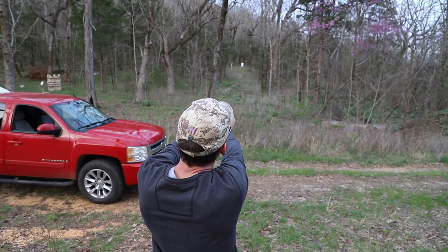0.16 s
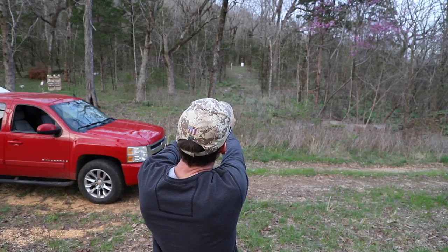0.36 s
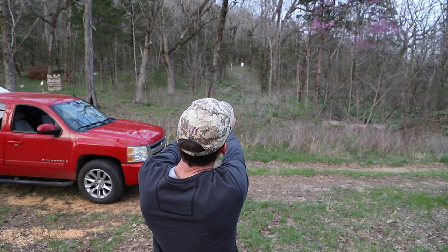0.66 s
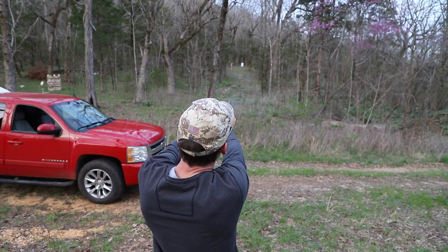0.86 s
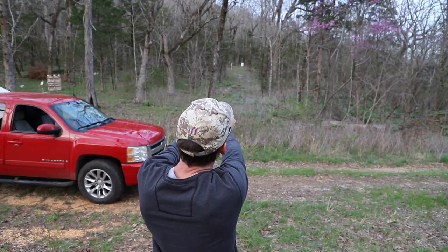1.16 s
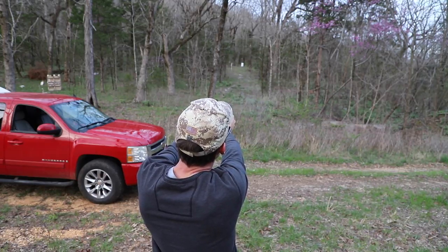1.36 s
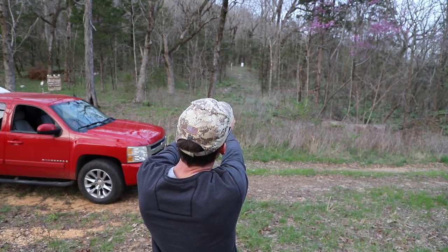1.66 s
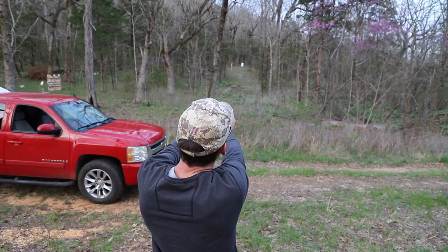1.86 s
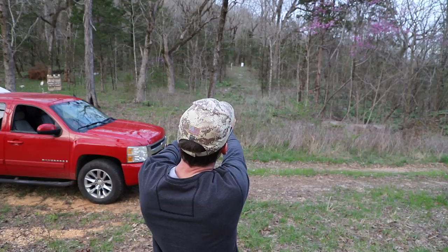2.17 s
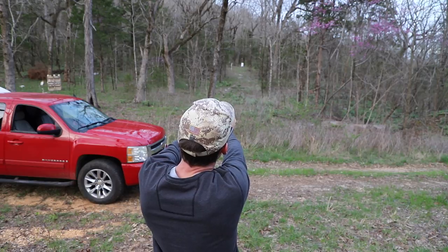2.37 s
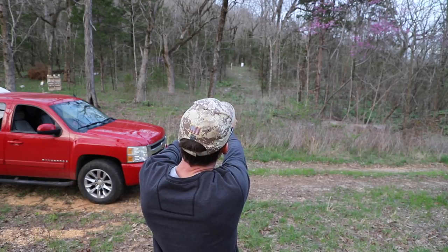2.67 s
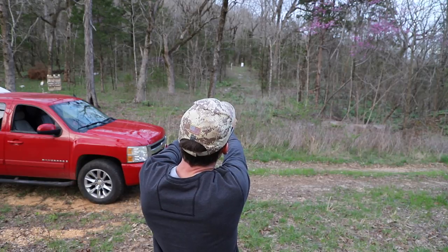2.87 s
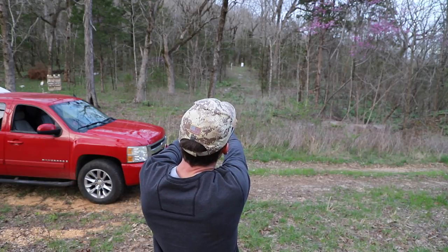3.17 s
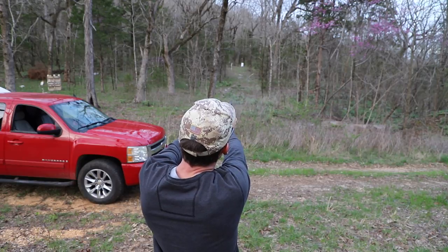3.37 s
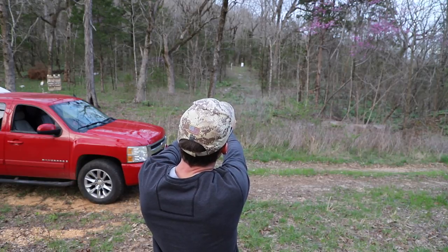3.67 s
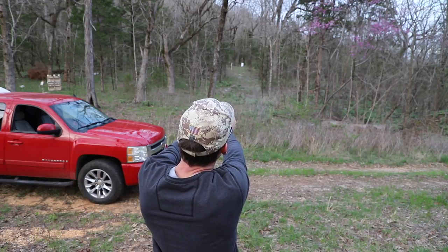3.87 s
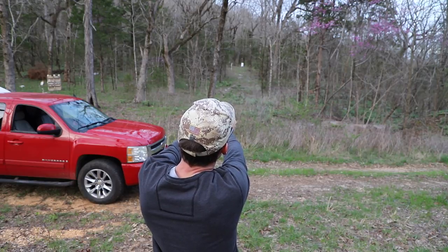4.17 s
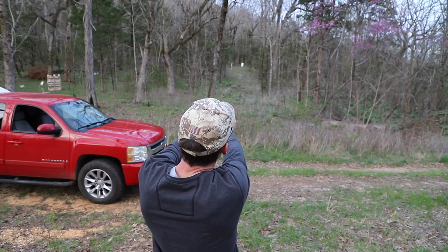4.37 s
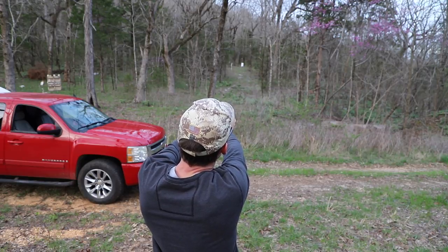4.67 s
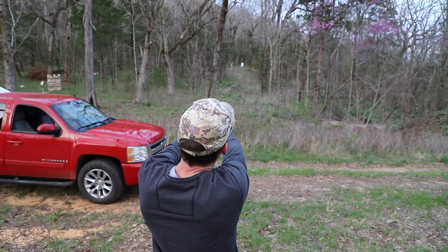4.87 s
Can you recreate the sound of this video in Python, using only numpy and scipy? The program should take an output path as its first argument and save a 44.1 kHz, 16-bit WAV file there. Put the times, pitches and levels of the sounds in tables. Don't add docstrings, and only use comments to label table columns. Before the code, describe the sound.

Two suppressed pistol shots snap close by at a wood's edge, each echoing off trees, followed by a far target crack and dropped case.

```python
import sys
import numpy as np
from scipy import signal
from scipy.io import wavfile

SR = 44100
rng = np.random.default_rng(int(sys.argv[2]) if len(sys.argv) > 2 else 0)


def pcm_store(signal):
    levels = np.round(np.clip(np.atleast_2d(signal), -1, 1) * 32767)
    wavfile.write(sys.argv[1], SR, levels.astype(np.int16).T)


def linear_from_db(decibels):
    return 10 ** (np.asarray(decibels, float) / 20)


N = 221690
TIME = np.arange(N) / SR

# start_s, strength_db
SHOTS = [
    (0.933, 0.5),
    (3.3313, 2),
]
# after_blast_s, level_db, hold_s, sag_db_per_s, release_db_per_s
GAS_STAGES = [
    (-.0031, -24, .0012, 1500, 30000),
    (-.0017, -11, .0014, 5000, 30000),
    (0, 12.5, .0066, 1600, 6000),
    (.0092, -21, .025, 280, 3000.5),
    (0.037, -38.5, .034, 420.5, 1000),
]


def gas_flow(shot_s):
    attack_s = 0.00036
    age = np.arange(-.005, .15, 1 / SR)
    flow = 0
    for start_s, level_db, hold_s, sag, release in GAS_STAGES:
        opening = np.clip((age - start_s) / attack_s + 1, 0, 1) ** 2
        sag_db = sag * np.clip(age - start_s, 0, hold_s)
        release_db = release * np.maximum(age - start_s - hold_s, 0)
        flow = flow + opening * linear_from_db(level_db - sag_db - release_db)
    return np.interp(TIME - shot_s, age, flow, left=0, right=0)


# pitch_hz, width_hz, level_db
SILENCER = [(870, 300, -2), (1950, 400, -4), (2745, 420, 1.5), (3880, 800, 2), (6270, 1100, 2),
            (9300, 2100, -5.5), (12400, 6600, -10.5)]


def gas_jet():
    white = rng.standard_normal(N)
    gas = 0
    for k, (hz, width_hz, db) in enumerate(SILENCER):
        gas = gas + (-1) ** k * linear_from_db(db) * resonance(white, hz, width_hz) / np.sqrt(width_hz)
    jet = sum(linear_from_db(db) * gas_flow(s) for s, db in SHOTS)
    hiss = rms_one(filtered(rng.standard_normal(N), 2, 8500, "high"))
    rattle = linear_from_db(-6.5) * hiss * np.minimum(jet, linear_from_db(-22.5))
    return rms_one(gas) * jet + rattle


# pitch_hz, level_db, t60_s
THUMP = [(323, 3, 0.023), (420, -10, 0.018), (860, 5, 0.016)]
# after_blast_s, pitch_hz, level_db, t60_s
SLUG = (0.0056, 140, 0, 0.02)


def pressure_push():
    late_s, slug_hz, slug_db, slug_t60_s = SLUG
    slug = ring(clicks([s + late_s for s, _ in SHOTS], slug_db), slug_hz, slug_t60_s)
    return struck(SHOTS, THUMP, echo_s=0.0035, echo_db=-6) + slug


# start_s, peak_db
SLIDE = [
    (.9568, -5),
    (3.3536, -4),
]
# pitch_hz, level_db, t60_s
SLIDE_MODES = [(1500, -6.5, .005), (2730, -6, 0.0022), (4530, -2.5, 0.0019), (6650, -7.5, 0.0033)]


def slide():
    return struck(SLIDE, SLIDE_MODES, echo_s=0.00032, echo_db=0.0)


def echo_strength(age):
    brush_db, brush_rise_s = -38, 0.022
    tree_line_s, tree_rise_s, tree_line_db = .085, .006, -32.5
    thicken_db, deepest_s = 2.5, .16
    spread_db_per_decade, leaf_loss_db_per_s = 21, 25
    brush = linear_from_db(brush_db) * np.clip(age / brush_rise_s, 0, 1) ** 2
    deep = np.maximum(age, deepest_s)
    thick_db = thicken_db * np.clip((age - tree_line_s) / (deepest_s - tree_line_s), 0, 1)
    loss_db = spread_db_per_decade * np.log10(deep / deepest_s) + leaf_loss_db_per_s * (deep - deepest_s)
    reached = np.clip((age - tree_line_s) / tree_rise_s, 0, 1)
    return (1 - reached) * brush + reached * linear_from_db(tree_line_db + thick_db - loss_db)


# pitch_hz, level_db_per_hz
ECHO_COLOUR = [(24, -53), (40, -26), (117, -4.5), (213, -8), (303, -6), (625, -9), (955, -13), (1060, -11),
               (2120, -6.5), (3420, -5.5), (4970, -11.5), (5920, -7.5), (15700, -31)]
# pitch_hz, width_hz, level_db
ECHO_PEAKS = [(600, 250, 4), (1900, 150, 4), (3400, 250, 8), (4000, 170, 6.5), (5950, 320, 6),
              (7300, 220, 4.5), (9370, 220, 4)]
# pitch_hz, loss_db_per_s
AIR_LOSS = [(60, 12.5), (300, -7.5), (1000, -7.5), (3000, 4.5), (6000, 22.5), (10000, 40), (16000, 47)]


def woods():
    out, age = np.zeros(N), TIME[:2 * SR]
    strength = echo_strength(age)
    for hz, band in bands(trunks(per_s=2500, spread_db=2.0, lumps_db=2.5), ECHO_COLOUR):
        fading = strength * linear_from_db(-at_hz(AIR_LOSS, hz) * (age - 0.0949))
        for s, db in SHOTS:
            i = round(s * SR)
            out[i:i + len(age)] += linear_from_db(db) * band[i:i + len(age)] * fading[:N - i]
    peaks = sum((linear_from_db(db) - 1) * resonance(out + 1e-18, hz, width_hz) for hz, width_hz, db in ECHO_PEAKS)
    return linear_from_db(-2.0) * (out + peaks)


HIT_S = [
    1.514,
    3.9137,
]
# peak_db, low_share_db, main_hz, top_hz, top_share_db
HITS = [(-7.5, -22, 2950, 7600, -13), (-7, -14, 3150, 8700, -17.5)]
# main_width_hz, ground_echo_db
HIT_BODY = [(1700, -11.5), (1250, -38)]
# pitch_hz, width_hz, level_db
HIT_MODES = [(1900, 620, 0), (2500, 480, -11), (4460, 660, -16.5), (5800, 870, -24), (7250, 500, -25),
             (11400, 780, -29.5)]


def target_crack():
    crack = 0
    (low_hz, low_width_hz, _), *upper = HIT_MODES
    for s, hit, (width_hz, echo_db) in zip(HIT_S, HITS, HIT_BODY):
        db, low_db, main_hz, top_hz, top_db = hit
        blow = clicks([s, s + 0.0018], [db, db + echo_db])
        modes = [(low_hz, low_width_hz, low_db), (top_hz, 1000, top_db)] + upper
        crack = crack + sum(linear_from_db(level_db) * swell(blow, hz, w) for hz, w, level_db in modes)
        main = resonance(swell(blow, main_hz, width_hz), main_hz, width_hz)
        crack = crack + linear_from_db(4.5) * main
    return crack


# level_db, tilt_db_per_octave, near_ground_scatter_db, t60_s
HIT_TAILS = [
    (-46.5, 0.6, -52, 1.4),
    (-40.5, 4.5, -34.5, 1.4),
    (-38.5, -0.35, -65, 1.63),
]
# pitch_hz, level_db_per_hz
HIT_COLOUR = [(180, -32), (300, -9), (358, -11.5), (448, -4), (544, -6), (800, -8), (1250, -0.5),
              (1570, -2.5), (2590, -1.5), (3290, 2), (14000, -39)]


def target_echo():
    tail, starts = np.zeros(N), [-.12] + HIT_S
    for hz, band in bands(trunks(per_s=3100, spread_db=2.5, lumps_db=0.5), HIT_COLOUR):
        for s, (db, tilt_db, near_db, t60_s) in zip(starts, HIT_TAILS):
            i = max(round(s * SR), 0)
            span = slice(i, i + 2 * SR)
            age = TIME[span] - s
            fall_db_per_s = 60 / t60_s + .8 * at_hz(AIR_LOSS, hz)
            far, near = linear_from_db(db - fall_db_per_s * age), linear_from_db(near_db - 530 * age)
            tail[span] += band[span] * linear_from_db(tilt_db * np.log2(hz / 3000)) * (far + near)
    return tail


def target():
    return filtered(target_crack() + target_echo(), 2, 9000, "low")


# start_s, peak_db
CASE = [
    (1.258, -16.5),
    (4.2921, -18),
]
# pitch_hz, level_db, t60_s
CASE_MODES = [(1888, -14.5, 0.0012), (2700, -9, 0.0076), (3350, -3, 0.0098), (4400, -9, 0.004),
              (5276, -10, 0.012), (7107, -11, 0.01), (8400, -11, 0.005), (12400, -12, .002)]
# pitch_hz, width_hz, level_db
CASE_HOLLOW = (1257, 444, 0.4)
# pitch_hz, width_hz, level_db, t60_s
BRASS = [(7150, 220, -31, .2), (11800, 300, -48, .08)]


def case():
    s, db = np.transpose(CASE)
    hollow_hz, hollow_width_hz, hollow_db = CASE_HOLLOW
    out = linear_from_db(-0.5) * struck(CASE, CASE_MODES, echo_s=0.00046, echo_db=5.5)
    out += swell(clicks(s + 0.00079, db + hollow_db), hollow_hz, hollow_width_hz)
    for hz, width_hz, ring_db, t60_s in BRASS:
        white = rng.standard_normal(N)
        tumble = rms_one(resonance(resonance(white, hz, width_hz), hz, width_hz))
        for start_s, peak_db in CASE:
            fall_db = 60 * np.maximum(TIME - start_s, 0) / t60_s
            out += tumble * (TIME > start_s + .004) * linear_from_db(peak_db + ring_db - fall_db)
    return out


# start_s, peak_db, pitch_hz
SLAPS = [
    (1.019, -21, 3346),
    (1.087, -15.5, 3000),
    (1.176, -23, 3875),
    (3.419, -16, 3350),
    (3.485, -17, 3200),
    (3.53, -20, 3300),
    (3.5735, -21, 2500),
]
SPLINTERS = [
    (0.0629, -24, 3700),
    (0.1068, -37, 4200),
    (2.2732, -39, 2200),
    (3.938, -30, 3420),
    (4.0633, -36, 4030),
    (4.0655, -22, 3800),
    (4.0729, -20, 3040),
    (4.0768, -24.5, 3040),
]
GRAVEL = [
    (1.7245, -31, 1950),
    (1.7351, -26, 3300),
    (1.7424, -30, 3600),
    (1.7774, -39, 2650),
    (1.8347, -32, 3500),
    (1.8564, -38, 2300),
    (1.9255, -32, 4400),
    (1.94, -41, 3600),
]
BOUNCES = [
    (1.2686, -26, 3560),
    (1.3877, -33, 3460),
    (1.4353, -32, 4000),
    (4.2982, -24, 2900),
    (4.3005, -25, 3600),
    (4.4063, -32, 3500),
]
TWIGS = [(.1804, -44, 5200), (.2104, -44, 4200), (.3444, -47, 5200), (.4144, -46, 3140),
         (2.1674, -45, 3900), (2.4794, -53, 3130), (2.7586, -41, 3400), (2.8414, -50, 3500),
         (2.9394, -47.5, 3900), (2.9524, -48, 3400), (3.038, -47, 2900), (3.0524, -47, 3590),
         (4.7564, -46.5, 3900)]
# treble_share_db, length_s, width_share
GRAIN = [
    (-22, 0.0055, .75),
    (-33, 0.0042, .6),
    (-21, .0045, 0.78),
    (-24, .0035, .55),
    (-27, .003, .35),
]


def patter():
    out, size = np.zeros(N), 3000
    age = np.arange(size) / SR
    for table, (treble_db, length_s, share) in zip((SLAPS, SPLINTERS, GRAVEL, BOUNCES, TWIGS), GRAIN):
        for s, db, hz in table:
            noise = rng.standard_normal(size)
            noise[0] = 4
            body = resonance(noise, hz, np.clip(1.1 * share, .3, 2) * hz)
            body = rms_one(filtered(filtered(body, 1, 1.2 * hz, "low"), 3, 7500, "low"))
            treble = rms_one(filtered(noise, 3, 7500, "high"))
            puff = (body + linear_from_db(treble_db + 4) * treble) * np.exp(-age / max(length_s, .0005))
            i = round(s * SR)
            out[i:i + size] += linear_from_db(db - 3.5) * puff[:N - i] / np.abs(puff).max()
    return out


RUSTLE_S = [
    1.264,
    1.724,
    4.137,
    4.165,
    4.298,
]
# level_db, length_s
RUSTLES = [(-53, .025), (-48, 0.0316), (-55, 0.012), (-57.5, .035), (-53, 0.033)]


def leaves():
    crackle = filtered(trunks(per_s=6000, spread_db=3.0, lumps_db=1.5)[0], 1, 6000, "high")
    stir = 0
    for s, (db, length_s) in zip(RUSTLE_S, RUSTLES):
        stir = stir + linear_from_db(db) * (TIME > s) * np.exp(-(np.maximum(TIME - s, 0) / length_s) ** 2)
    return crackle * stir


# start_s, length_s, from_hz, to_hz, level_db
DOVE_CALLS = [
    (2.5, .4, 516.5, 508, -59),
    (3.66, .4, 505, 505, -58.5),
    (4.52, .6, 501.4, 507, -60),
]
FAR_CALLS = [
    (4.72, .28, 1550, 2130, -69),
    (2.44, .06, 1480, 1480, -66),
    (.176, .04, 11700, 11700, -67),
]


def birds():
    out = np.zeros(N)
    dove_shape, far_shape = (0.21, 11, 8), (.5, 14, 10)   # rise_share, rise_db, fall_db
    for calls, (rise_share, rise_db, fall_db) in ((DOVE_CALLS, dove_shape), (FAR_CALLS, far_shape)):
        for s, length_s, from_hz, to_hz, db in calls:
            done = np.clip((TIME - s) / length_s, 0, 1)
            hz = to_hz + (from_hz - to_hz) * np.exp(-done / .35)
            level_db = db + np.interp(done, [0, rise_share, 1], [-rise_db, 0, -fall_db])
            edge = np.clip(np.minimum(done, 1 - done) * length_s / 0.017, 0, 1)
            tone = np.sqrt(2) * np.sin(2 * np.pi * np.cumsum(hz) / SR)
            out += edge * linear_from_db(level_db + 2.0 * drift(17)) * tone
    return out


# nearest_s, pass_s, hum_db, tyre_swish_db,
# rumble_swell_db
PASSES = [
    (0, 0.33, -64, -76, 0.8),
    (.77, 0.12, -52.5, -68.5, -0.26),
    (1.5, .3, -84, -61, 3.5),
    (3.05, 0.21, -91.5, -70.5, -1.7),
    (3.6, 0.46, -76, -70.5, 4.5),
]


def nearness():
    return np.array([1 / (1 + ((TIME - s) / pass_s) ** 2) for s, pass_s, *levels in PASSES])


# pitch_hz, width_hz, level_db
DRONE_PEAKS = [(454, 40, -3), (505, 100, 2)]


def drone():
    white, road = rng.standard_normal((2, N))
    hum_gain, swish_gain = linear_from_db(np.transpose(PASSES)[2:4]) @ nearness()
    hoarse = sum(linear_from_db(db) * rms_one(resonance(resonance(white, hz, w), hz, w)) for hz, w, db in DRONE_PEAKS)
    swish_hz, width_hz = 800, 450
    swish = resonance(resonance(road, swish_hz, width_hz), swish_hz, width_hz)
    steady_swish_db = -71.5
    return hum_gain * rms_one(hoarse) + (linear_from_db(steady_swish_db) + swish_gain) * rms_one(swish)


# pitch_hz, level_db_per_hz
FLOOR = [(12, -47), (20, -11.5), (98, -3), (202, -9.5), (226, -10.5), (260, -8.5), (374, -9), (522, -13),
         (568, -13.5), (1050, -28), (3110, -27.5), (4600, -32.5), (15700, -35)]


def background():
    floor_db, steady_rumble_db = -55.5, -1.48
    swell_db = steady_rumble_db + np.transpose(PASSES)[4] @ nearness() + 1.2 * drift(1.8)
    air = bands(rng.standard_normal((2, N)), FLOOR)
    return linear_from_db(floor_db) * sum(band * linear_from_db(swell_db / (1 + (hz / 1300) ** 2)) for hz, band in air)


def rms_one(x):
    return x / np.sqrt(np.mean(x ** 2) + 1e-20)


def filtered(x, order, hz, kind):
    return signal.sosfilt(signal.butter(order, hz, kind, fs=SR, output="sos"), x)


def at_hz(points, hz):
    point_hz, value = np.transpose(points)
    return np.interp(np.log(hz), np.log(point_hz), value)


def drift(rate_hz):
    r = np.exp(-80 * np.pi * rate_hz / SR)
    slow = signal.lfilter([1], [1, -2 * r, r * r], rng.standard_normal(N // 40 + 2002))[2000:]
    return np.interp(np.arange(N) / 40, np.arange(len(slow)), rms_one(slow))


def ring(blows, hz, t60_s):
    r, w = linear_from_db(-60 / (t60_s * SR)), 2 * np.pi * hz / SR
    return signal.lfilter([0, np.sin(w)], [1, -2 * r * np.cos(w), r * r], blows + 1e-18)


def resonance(x, hz, width_hz):
    r = np.exp(-np.pi * width_hz / SR)
    zeros = np.array([1, 0, -1]) * (1 - r * r) / 2
    return signal.lfilter(zeros, [1, -2 * r * np.cos(2 * np.pi * hz / SR), r * r], x)


def swell(click, hz, width_hz):
    return resonance(resonance(click, hz, width_hz), hz, width_hz) * SR / width_hz / 2


def clicks(times_s, db):
    out = np.zeros(N)
    out[np.round(np.asarray(times_s) * SR).astype(int)] = linear_from_db(np.asarray(db))
    return out


def struck(events, modes, echo_s, echo_db):
    s, db = np.transpose(events)[:2]
    train = clicks(s, db) + clicks(s + echo_s, db + echo_db)
    return sum((-1) ** k * linear_from_db(mode_db) * ring(train, hz, t60_s) for k, (hz, mode_db, t60_s) in enumerate(modes))


def bands(white, spectrum):
    edges = 22 * 2 ** np.arange(0, 9.7, 1 / 3)
    centres = np.sqrt(edges[1:] * edges[:-1])
    gains = linear_from_db(at_hz(spectrum, centres))
    gains = gains / np.sqrt(np.sum(gains ** 2 * np.diff(edges)) / (SR / 2))
    white = np.hstack([white[:, -SR // 4:], white])
    for k, hz in enumerate(centres):
        yield hz, gains[k] * filtered(white[k % 2], 2, edges[k:k + 2], "band")[-N:]


def trunks(per_s, spread_db, lumps_db):
    sizes = linear_from_db(spread_db * np.minimum(rng.exponential(1, (2, N)), 4))
    signs = rng.choice([-1, 1], (2, N))
    present = rng.random((2, N)) < per_s / SR
    return rms_one(sizes * signs * present * linear_from_db(lumps_db * np.tanh(drift(90))))


def scene():
    pistol = gas_jet() + pressure_push() + slide()
    debris = case() + patter() + leaves()
    return (pistol + woods() + target() + debris + birds() + drone() + background())[None]


def low_pass(x):
    return signal.sosfilt(signal.butter(12, 15830, fs=SR, output="sos"), x)


def record(dry):
    top = 0.85
    clipped = dry / (1 + np.abs(dry / top) ** 6) ** (1 / 6)
    coupled = filtered(clipped, 1, 12, "high")
    mix = filtered(coupled, 4, 16500, "low")
    return low_pass(mix)


dry = scene()
out = record(dry)
pcm_store(out)
```